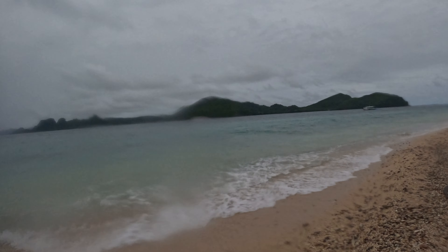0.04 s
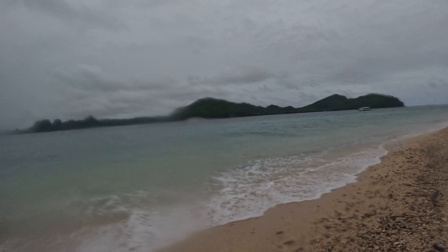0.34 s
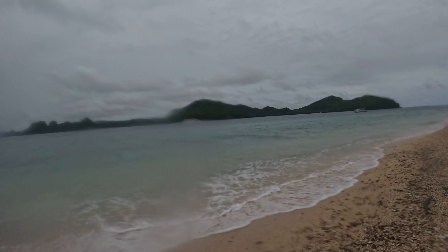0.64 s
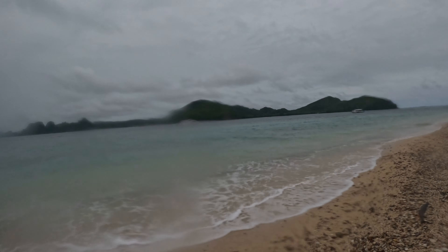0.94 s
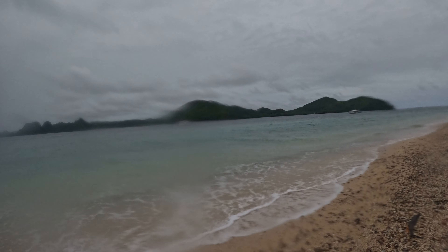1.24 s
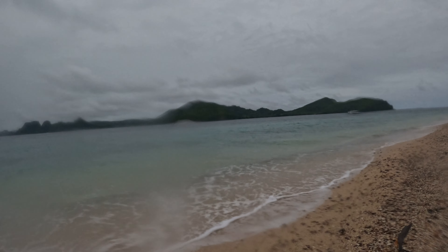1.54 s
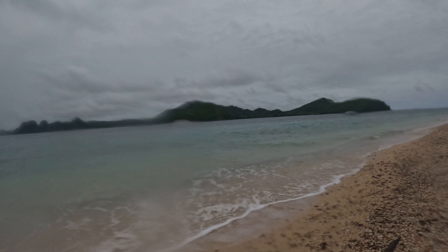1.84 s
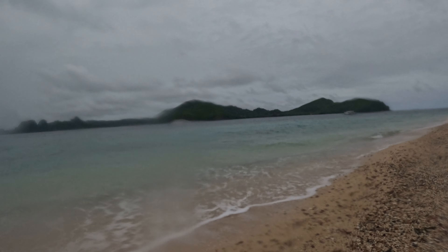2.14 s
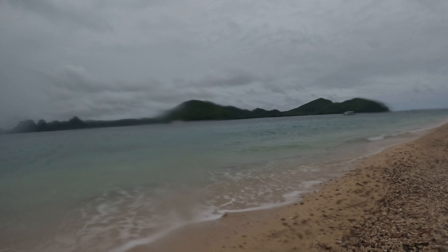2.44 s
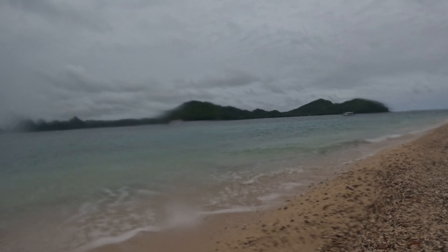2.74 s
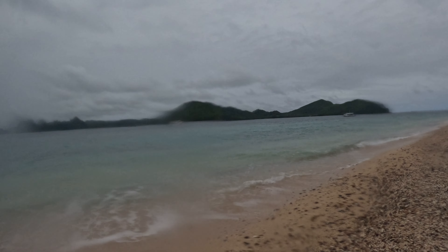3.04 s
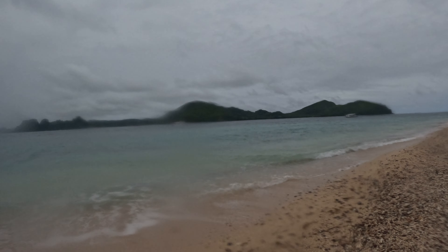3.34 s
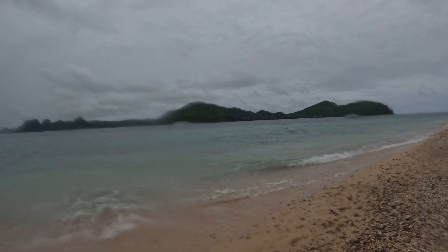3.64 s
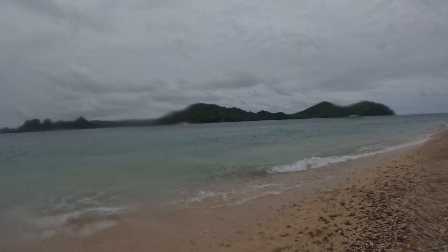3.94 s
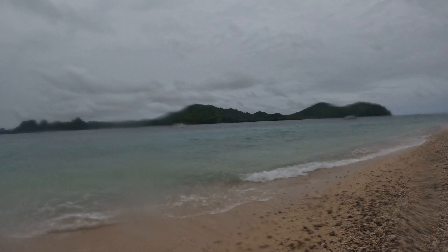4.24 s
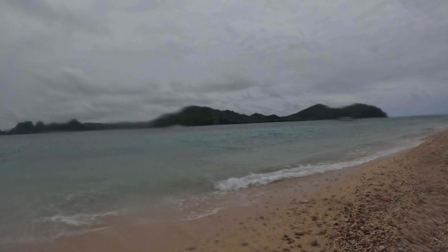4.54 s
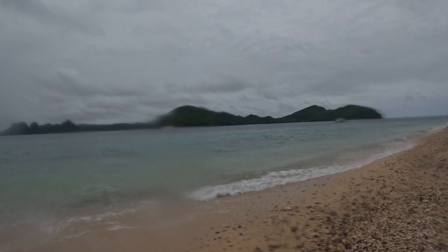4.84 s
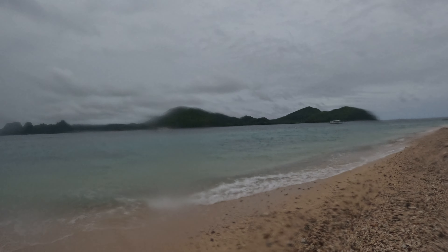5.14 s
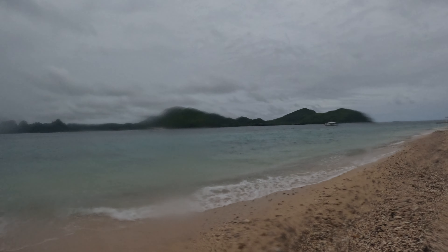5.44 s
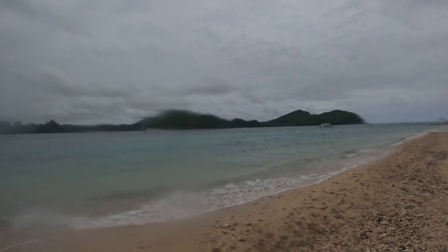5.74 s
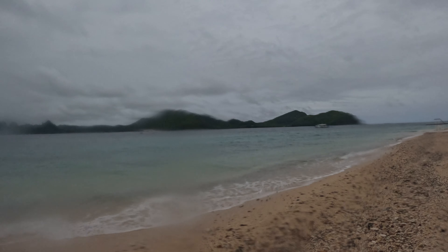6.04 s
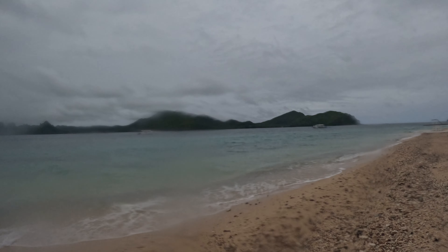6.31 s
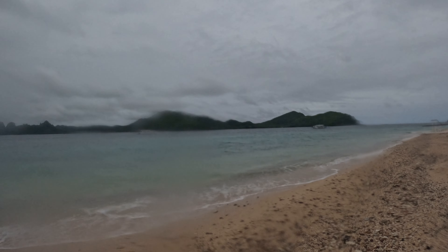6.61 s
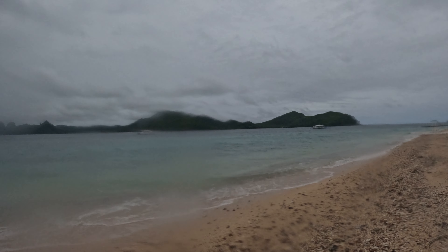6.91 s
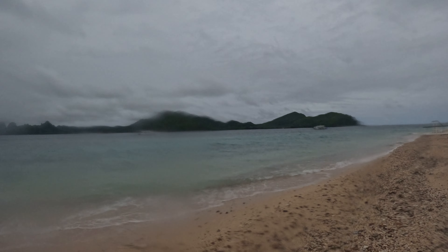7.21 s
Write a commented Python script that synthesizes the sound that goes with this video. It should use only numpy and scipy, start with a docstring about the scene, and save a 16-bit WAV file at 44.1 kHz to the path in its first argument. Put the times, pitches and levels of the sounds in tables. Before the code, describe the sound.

Close, brief squeaks of wet rubber come throughout, often in clusters, as a waterproof case swings and jolts with the microphones sealed inside. Early on, its shell takes two hard knocks, the loudest sounds. Low handling rumble and dull bumps continue beneath. Through the case wall come quiet waves on a beach, fading foam and scattered footsteps on coral rubble, with one small coral clink just before the end.

```python
"""Small waves wash in, muffled, over the rumble of a waterproof camera case carried across coral rubble.
Both microphones sit inside the sealed case, so its own noises are closest: with the steps, wet rubber
rubs on it in short stick-slip squeaks, and jolts knock its shell and thump the camera body.
Beyond the wall, foam fizzes away on the near sand, the next wave washes in, rubble crunches underfoot
and, near the end, two pieces of coral clink."""
import sys
import numpy as np
from scipy import signal
from scipy.fft import rfft, irfft, next_fast_len
from scipy.io import wavfile
from scipy.ndimage import uniform_filter1d, map_coordinates

SR = 44100
rng = np.random.default_rng(int(sys.argv[2]) if len(sys.argv) > 2 else 0)


def bounce(signal):
    """Save signal as a 16-bit WAV file at the path given by the first command-line argument."""
    frames = np.transpose(np.atleast_2d(signal))
    limited = np.clip(frames, -1, 1)
    pcm = np.round(limited * 32767).astype(np.int16)
    wavfile.write(sys.argv[1], SR, pcm)


N = 329411
TIME = np.arange(N) / SR

# the water's edge, each layer on its own relative scale: time_s, wash_db, foam_db
SEA_LEVELS = [(0.0, -48.5, -60), (0.35, -56.5, -64), (0.79, -55.5, -69), (0.96, -61.5, -71.5),
              (1.48, -55.5, -72), (2.04, -60.5, -74.5), (2.43, -61, -86), (4.03, -52.5, -78.5),
              (4.33, -56, -84), (5.55, -56, -86), (5.8, -52.5, -82.5), (6.59, -58.5, -85),
              (7.16, -58.5, -80.5), (7.47, -56, -78.5)]
# spectra of the wash, the foam, the carried case and the microphones' own noise: freq_hz, density_db
WASH_SPECTRUM = [(70, 7.5), (165, 12.5), (270, -1.5), (350, -5), (440, -3), (580, -4.5), (710, 1.5),
                 (850, -4.5), (1330, -1), (1600, -18), (2100, -9.5), (3200, -24), (4200, -34), (6500, -41),
                 (10000, -59.5)]
FOAM_SPECTRUM = [(300, -7.5), (900, -10), (1600, 4.5), (2000, -1.5), (2400, -6), (3250, -3.5),
                 (4000, -12.5), (5500, -24.5), (6200, -31), (6750, -25), (7500, -37.5), (8800, -36.5),
                 (12000, -60.5)]
RUMBLE_SPECTRUM = [(8, 10), (20, 8.5), (35, -9), (48, -8), (65, -19.5), (100, -41.5), (200, -61.5),
                   (400, -92.5)]
HISS_SPECTRUM = [(50, 3), (300, -4.5), (3000, -11), (5000, -17), (8000, -19), (13000, -35.5)]
# wide swings of the carried case: centre_s, rumble_rise_db
SWINGS = [(.28, 13), (.69, 11.5), (1.62, 11.5), (2.291, 15), (2.849, 15), (3.54, 12), (4.12, 10),
          (4.661, 6.5), (5.32, 14), (6.832, 8.5), (7.45, 11.5)]
# the hardest jolts to the camera: start_s, peak_db
JOLTS = [(0.042, -33), (.542, -24.5), (.644, -24.5), (1.317, -33), (1.785, -35), (2.351, -38.5),
         (2.469, -34.5), (3.449, -31.5), (3.905, -34), (4.05, -35.5), (4.738, -26.5), (5.294, -33.5),
         (5.762, -31), (6.173, -34), (6.9, -39.5)]
# ringing of the camera body, the case shell and coral: pitch_hz, level_db, t60_s
BODY_MODES = [(166.1, 9.5, 0.071), (218, -7.5, 0.094), (256, -17, 0.0082)]
SHELL_MODES = [(487, -11.5, 0.047), (736, -22, 0.093), (1190, -3.5, 0.019), (1130, -1.5, 0.037),
               (1280, -19, 0.02), (2030, 2.5, 0.0072), (2393, -5.5, 0.012), (3025, -17.5, 0.014),
               (3020, -16.5, 0.017)]
CORAL_MODES = [(2830, -7, 0.015), (2920, 7, 0.012), (4350, -26, .015), (5670, -17, 0.015)]
# rubs of wet rubber: start_s, length_s, lead_in_s, level_db, swell_db, pressed_pitch_hz, slack_rise_hz,
# then relative weights of the timbre: second_harmonic_db, third_harmonic_db, rasp_db
SQUEAKS = [(0.734, 0.013, 0.0074, -15.5, 0, 855, 271.6, -1.5, -8, -16.5),
           (.773, 0.045, .003, -18.5, -9, 895, 214.7, -1, -5, -16),
           (0.887, 0.024, 0.0045, -16, -3, 923, 273.3, 1, 1, -17.5),
           (0.916, 0.023, .002, -21.5, -1, 945, 141, -0.5, -6.5, -9.5),
           (0.944, 0.029, 0.0024, -18, 1, 956, 219, -1.5, -4, -14.5),
           (1.164, 0.02, 0.0055, -24.5, -1.5, 1018, 59.6, -13.5, -22, -9.5),
           (1.583, 0.055, 0.002, -17.5, -2.5, 922, 340, -2, -2.5, -16.5),
           (1.697, 0.039, 0.0018, -19, -10, 861, 272.5, 0.5, 0.5, -21),
           (1.865, 0.058, 0.0034, -20, -10, 875, 168.7, -1, -3, -17.5),
           (2.411, .031, 0.004, -23, -13, 873, 130, -26, -31, -3.5),
           (2.448, 0.016, .002, -28.5, 0.5, 875, 127, -31, -40, 0),
           (2.964, 0.041, 0.0066, -14.5, -4.5, 863, 276.4, -5.5, -23, -16.5),
           (3.062, .029, 0.0035, -17, -7, 815, 262.3, -10, -25, -5),
           (3.307, .012, 0.0043, -24, -9, 900, 237, -15, -33, -10.5),
           (3.62, 0.0232, 0.0084, -15.5, 2.5, 1004, 119.2, 0, -14, 1.5),
           (3.643, 0.049, .002, -23.5, -20, 866, 129, -21, -12, 0),
           (3.869, 0.0059, 0.0086, -24, -2.5, 911, 58.3, -16, -43, -16),
           (4.079, 0.0469, 0.0066, -15.5, -3, 835.5, 400, -2.5, -13.5, -6),
           (4.168, 0.06, 0.0033, -17, 1, 856, 272.3, -5, -18, -10),
           (4.873, 0.011, .003, -27.5, -2, 1056, 58.3, -4, -41, -11),
           (4.899, 0.039, 0.0026, -20.5, -9, 987, 285, -8, -26.5, -16.5),
           (5.617, 0.019, 0.0028, -22, 1, 926, 145, -12, -31.5, -21.5),
           (5.756, 0.01, 0.004, -23.5, -15.5, 984, 100, -18.5, -37, -16),
           (5.778, 0.035, 0.0049, -27, -25, 875, 59.3, -22.5, -28, -4),
           (5.885, 0.016, 0.0025, -27, -22, 1059, 80, -13, -27.5, -27),
           (6.237, 0.068, 0.0067, -16.5, -3, 948, 68, -19, -19, -13),
           (6.686, 0.06, 0.0039, -19, -7, 864.5, 185.6, -7.5, -12, -6.5)]
# spectra of the rubber's rasp and of the fizz as it snaps free: freq_hz, density_db
RASP_SPECTRUM = [(200, -38.5), (430, -10), (540, -27.5), (720, 6), (1350, 9), (1800, 1), (2200, -6),
                 (2600, -18), (3200, -24), (4000, -32.5), (5500, -46), (8000, -66), (12000, -76)]
FIZZ_SPECTRUM = [(1200, -13.5), (2200, 15.5), (3300, -3), (4000, -7), (5600, -16.5), (7000, -32.5),
                 (9000, -42), (13000, -55.5)]
# what the case wall lets through to the microphones: freq_hz, gain_db
CASE_WALL = [(300, 7.5), (700, 3.5), (3100, -9.5), (4000, -33), (5500, -22.5), (7000, -44), (9000, -45),
             (13000, -37)]
# soles pressing into rubble and sand: start_s, length_s, level_db, centre_hz
CRUNCHES = [(1.173, 0.054, -33.5, 1055), (1.242, 0.03, -33.5, 1110), (1.44, 0.15, -59, 5260),
            (1.483, 0.12, -47, 1870), (2.113, 0.11, -56, 4020), (2.147, 0.095, -52, 1210),
            (2.692, 0.091, -53, 980), (3.083, 0.048, -36, 1000), (3.27, 0.021, -36, 1070),
            (3.373, 0.084, -40, 1000), (3.618, 0.035, -29.5, 690), (3.875, 0.029, -39.5, 960),
            (4.308, 0.027, -43.5, 1120), (5.277, 0.043, -44, 960)]
# sharp knocks on the case, each with its own strength and brightness: start_s, peak_db, brightness_hz
KNOCKS = [(1.2619, -3.5, 2050), (1.3871, -9.5, 1210), (3.111, -47, 1000), (3.628, -26.5, 610),
          (4.736, -42.5, 700)]
# coral striking coral: start_s, peak_db
CLINKS = [(7.106, -40.5)]


def undb(db):
    """Decibels to gain."""
    return 10 ** (np.asarray(db) / 20)


def unit(x):
    """Scale to rms 1."""
    return x / np.sqrt(np.mean(x ** 2) + 1e-18)


def gain_at(points, hz):
    """Read a gain from (freq_hz, gain_db) points on a log-frequency axis."""
    freq_hz, db = np.transpose(points)
    return undb(np.interp(np.log(np.maximum(hz, 1)), np.log(freq_hz), db))


def colour(x, points):
    """Filter a sound by a spectrum."""
    size = next_fast_len(len(x))
    return irfft(rfft(x, size) * gain_at(points, np.arange(size // 2 + 1) * SR / size), size)[:len(x)]


def band(x, lo_hz, hi_hz, order=2):
    """Band-pass filter."""
    sos = signal.butter(order, [lo_hz, min(hi_hz, SR / 2 - 1)], "band", fs=SR, output="sos")
    return signal.sosfilt(sos, x)


def wander(t, rate_hz):
    """A smooth random curve of spread near 1 that changes rate_hz times a second."""
    return map_coordinates(rng.standard_normal(1024), [(t - t[0]) * rate_hz], order=2, mode="wrap")


def grains(size, spread_db=3):
    """Dense tiny impacts, some larger than the rest."""
    return unit(rng.standard_normal(size) * undb(spread_db * np.minimum(rng.exponential(size=size), 4)))


def add(track, start_s, sound):
    """Mix a sound into the track."""
    i = max(int(start_s * SR), 0)
    track[i:i + len(sound)] += sound[:max(N - i, 0)]


def ring(modes, t, detune=0.011):
    """The decaying modes of a struck thing, tuned a little differently at each blow."""
    return sum(undb(db) * np.sin(2 * np.pi * hz * (1 + detune * rng.standard_normal()) * t)
               * np.exp(-np.log(1000) * t / t60_s) for hz, db, t60_s in modes)


def sea(churn_db=2.78, flicker_db=1.5, wash_trim_db=-1.7, foam_trim_db=-1.0):
    """The wash churns band by band; countless bursting bubbles fizz while foam lies on the near sand."""
    times_s, *levels_db = np.transpose(SEA_LEVELS)
    wash_db, foam_db = (np.interp(TIME, times_s, db) for db in levels_db)
    edges_hz = np.geomspace(60, 13000, 8)
    water = sum(band(grains(N), lo, hi) * undb(churn_db * wander(TIME, 54))
                for lo, hi in zip(edges_hz, edges_hz[1:]))
    wash = colour(water, WASH_SPECTRUM)
    foam = colour(grains(N), FOAM_SPECTRUM) * undb(flicker_db * wander(TIME, 29))
    wash /= band(wash, 600, 1400).std()
    foam /= band(foam, 4000, 8000, order=6).std()
    return wash * undb(wash_db + wash_trim_db) + foam * undb(foam_db + foam_trim_db)


def case_rumble(rest_db=-42.5, swing_half_s=0.12):
    """The swinging, flexing case presses slowly on the air inside it, harder at each wide swing."""
    sway = signal.hilbert(colour(rng.standard_normal(N), RUMBLE_SPECTRUM), next_fast_len(N))[:N]
    steady = sway.real / np.sqrt(uniform_filter1d(np.abs(sway) ** 2, SR // 8))
    steady /= band(steady, 20, 70).std()  # rest_db is the level in this band
    swing_db = sum(db * np.exp(-((TIME - centre_s) / swing_half_s) ** 2) for centre_s, db in SWINGS)
    return band(steady * undb(rest_db + swing_db), 2, 600)


def microphone_hiss(level_db=-82.5):
    """Each of the two microphones adds its own faint noise."""
    return undb(level_db) * np.array([unit(colour(rng.standard_normal(N), HISS_SPECTRUM))
                                      for _ in range(2)])


def body_thumps(push_s=0.0042, release_lag_s=0.004, release_db=-17.5, knock_db=-15.5, tremor_db=-41):
    """The camera body thumps at jolts and knocks, as the rubber lets go, and as the hand trembles."""
    out, t = np.zeros(N), np.arange(SR // 6) / SR
    releases = [(start_s + length_s + release_lag_s, db + release_db)
                for start_s, length_s, _, db, *_ in SQUEAKS]
    knocks = [(start_s, db + knock_db) for start_s, db, _ in KNOCKS]
    tremors = [(rng.uniform(0, N / SR), tremor_db + 1.5 * rng.standard_normal()) for _ in range(14)]
    for start_s, peak_db in JOLTS + releases + knocks + tremors:
        thump = ring(BODY_MODES, t) * (1 - np.exp(-(t / push_s) ** 2))
        add(out, start_s, undb(peak_db) * thump / np.abs(thump).max())
    return out


def rubber_squeaks(edge_s=0.0013, tail_s=0.007, press_lead_s=0.00703, arch_power=1.8, dulling_db=-2.56,
                   snap_db=3, flutter_db=3, upper_db=-8.5, slope_db=-7.5, rasp_trim_db=-10, fizz_db=-23):
    """Rubber sticks and slips about 1000 times a second; pressed harder, it slows and snaps sharper."""
    out, preroll_s = np.zeros(N), 0.03
    t = np.arange(SR // 7) / SR - preroll_s
    for (start_s, length_s, lead_in_s, level_db, swell_db, pressed_hz, slack_rise_hz,
         second_db, third_db, rasp_db) in SQUEAKS:
        progress = np.clip(t / length_s, 0, 1)
        outside_s = np.maximum(-t, t - length_s)
        grip = (1 - np.tanh(outside_s / edge_s)) / 2
        # in light contact, just before and after the rub, it sings more faintly
        before = undb(-4) * np.exp(np.minimum(t, 0) / lead_in_s)
        after = undb(-15) * np.exp(np.minimum(length_s - t, 0) / tail_s)
        touch = np.where(progress < .5, before, after) * (1 - grip)
        # one arch of pressure dips the pitch: early in a fading rub, late in a swelling one
        hardest_s = length_s * np.clip(.5 + 0.1 * swell_db, 0, 1)
        slack = np.interp(t, [-press_lead_s, hardest_s, length_s + press_lead_s], [1, 0, 1]) ** arch_power
        hz = pressed_hz + slack_rise_hz * slack
        # the grip judders: each tighter moment is lower and snaps harder
        judder = wander(t, 193.6)
        snap = (grip + 0.64 * touch) * undb(snap_db * judder)
        hz *= 1 - 0.036 * judder * grip
        # grit in the contact makes the cycles uneven
        hz *= 1 + (0.009 + 0.097 * undb(rasp_db)) * wander(t, 545)
        phase = 2 * np.pi * np.cumsum(hz) / SR
        tone = (grip + touch) * np.sin(phase) * undb(flutter_db * wander(t, 260))
        bright_db = (second_db + third_db) / 2
        overtones_db = [second_db, third_db] + [bright_db + upper_db + slope_db * k for k in range(5)]
        for k, overtone_db in enumerate(overtones_db, 2):
            # uneven releases blur the high overtones most; easing pressure dulls them
            blur = 0.047 * (k - 1) * wander(t, 650)
            eased_db = overtone_db + dulling_db * (k + 1.5) * slack + 2 * wander(t, 400)
            tone += snap * undb(eased_db) * gain_at(CASE_WALL, k * hz) * np.sin(k * phase + blur)
        # every release sheds a little burst of noise
        bursts = rng.standard_normal((2, len(t))) * (1 + 0.51 * np.sin(phase))
        rasp = undb(rasp_db + rasp_trim_db) * unit(colour(bursts[0], RASP_SPECTRUM)) * (grip + touch)
        fizz = undb(bright_db + fizz_db) * unit(colour(bursts[1], FIZZ_SPECTRUM))
        fizz *= snap * (1 - 0.73 * slack)
        squeak = (tone / np.sqrt(2) + rasp + fizz) * undb(swell_db * (progress - .5))
        gripped_rms = np.sqrt(np.average(squeak ** 2, weights=grip))
        add(out, start_s - preroll_s, undb(level_db) * squeak / gripped_rms)
    return out


def through_shell(rubbing, ring_db=-12):
    """The rubbed shell rings along faintly around the microphones."""
    t = np.arange(SR // 10) / SR
    response = sum(undb(db) * np.cos(2 * np.pi * hz * t) * np.exp(-np.log(1000) * t / t60_s)
                   for hz, db, t60_s in SHELL_MODES)
    response /= np.abs(rfft(response)).max()
    return rubbing + undb(ring_db) * signal.fftconvolve(rubbing, response)[:N]


def rubble_crunches(band_ratio=1.514, catch_db=3):
    """Bits of coral grind under a sole, catching and giving way as the weight comes and goes."""
    out, t = np.zeros(N), np.arange(SR // 4) / SR
    for start_s, length_s, level_db, centre_hz in CRUNCHES:
        impacts = grains(len(t)) * undb(catch_db * wander(t, 140))
        grinding = band(impacts, centre_hz / band_ratio, centre_hz * band_ratio, order=3)
        weight = np.sin(np.pi * np.minimum(t / length_s, 1))
        add(out, start_s, undb(level_db) * unit(colour(grinding, CASE_WALL)) * weight)
    return out


def shell_knocks(crack_db=-6, crack_s=0.006, contact_s=0.00049):
    """A short contact rings the shell, with a brief crack of noise."""
    out, t = np.zeros(N), np.arange(SR // 8) / SR
    for start_s, peak_db, brightness_hz in KNOCKS:
        crack = undb(crack_db) * colour(rng.standard_normal(len(t)) * np.exp(-t / crack_s), CASE_WALL)
        crack = band(crack, brightness_hz / 2, brightness_hz * 3.7)
        ringing = band(ring(SHELL_MODES, t), brightness_hz / 3, brightness_hz * 12, order=1)
        knock = (ringing + crack) * (1 - np.exp(-(t / contact_s) ** 2))
        add(out, start_s, undb(peak_db) * knock / np.abs(knock).max())
    return out


def coral_clinks(contact_s=0.0003):
    """Two pieces of hard coral meet and ring briefly."""
    out, t = np.zeros(N), np.arange(SR // 10) / SR
    for start_s, peak_db in CLINKS:
        clink = ring(CORAL_MODES, t) * (1 - np.exp(-t / contact_s))
        add(out, start_s, undb(peak_db) * clink / np.abs(clink).max())
    return out


def scene():
    """The sealed case feeds both microphones alike; only a faint hiss differs between them."""
    inside = (through_shell(rubber_squeaks()) + shell_knocks() + coral_clinks() + body_thumps()
              + rubble_crunches() + sea() + case_rumble())
    return inside + microphone_hiss()


def record(dry):
    """The recorder cuts the treble above 13.2 kHz."""
    return signal.sosfilt(signal.ellip(8, .2, 70, 13200, fs=SR, output="sos"), dry)


dry = scene()
out = record(dry)
bounce(out)
```